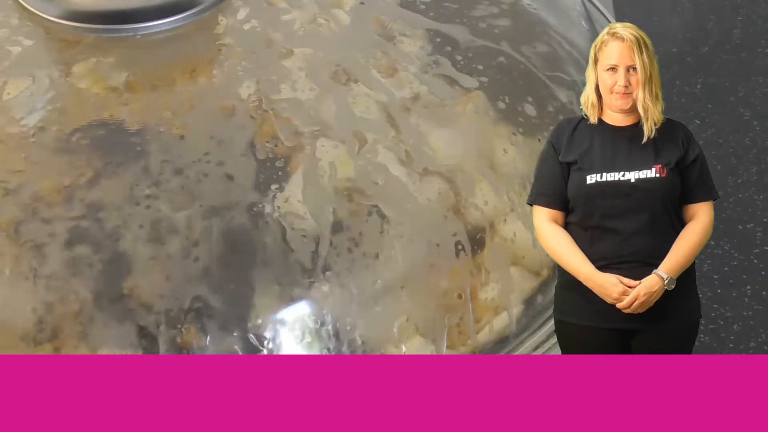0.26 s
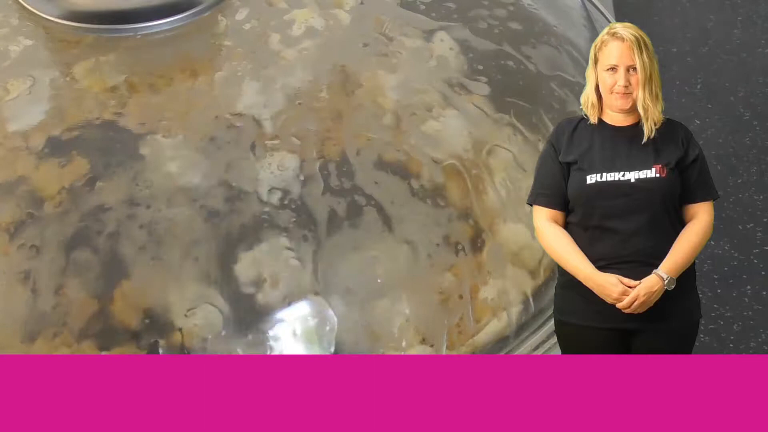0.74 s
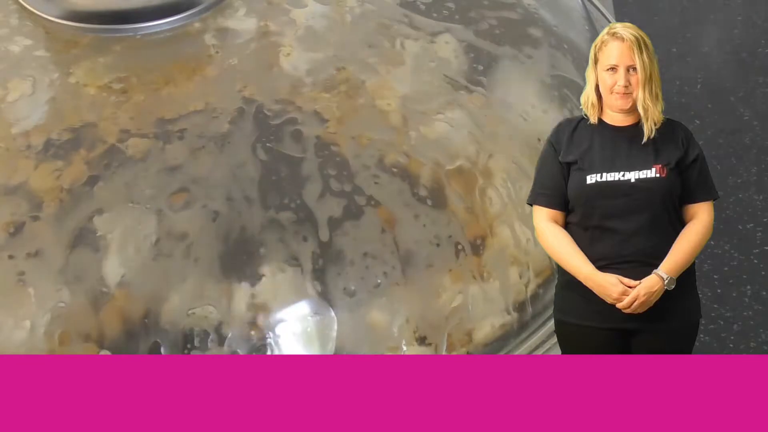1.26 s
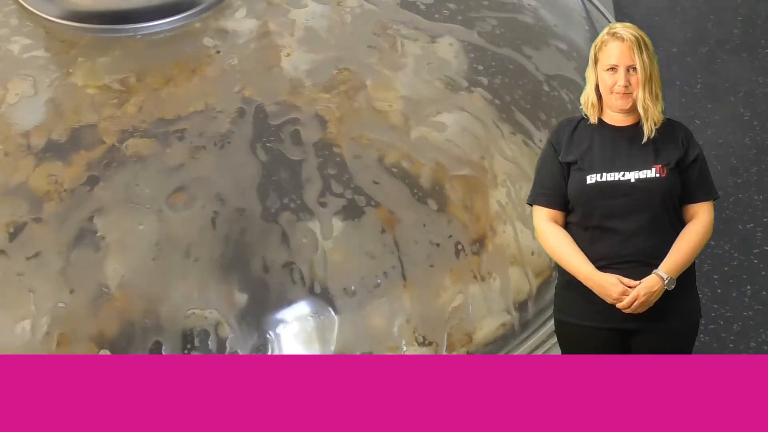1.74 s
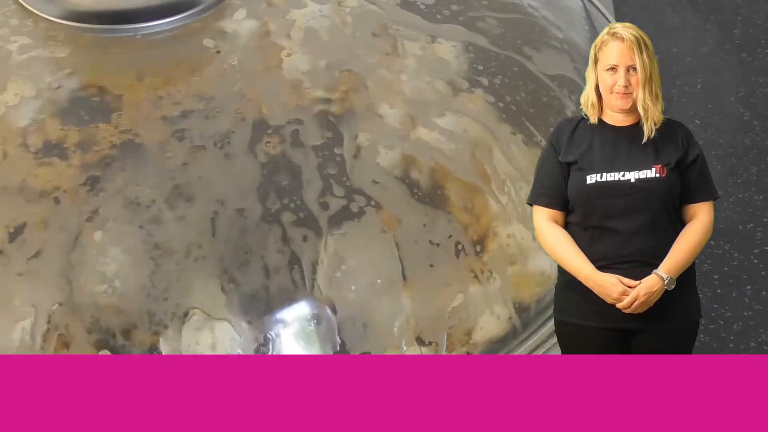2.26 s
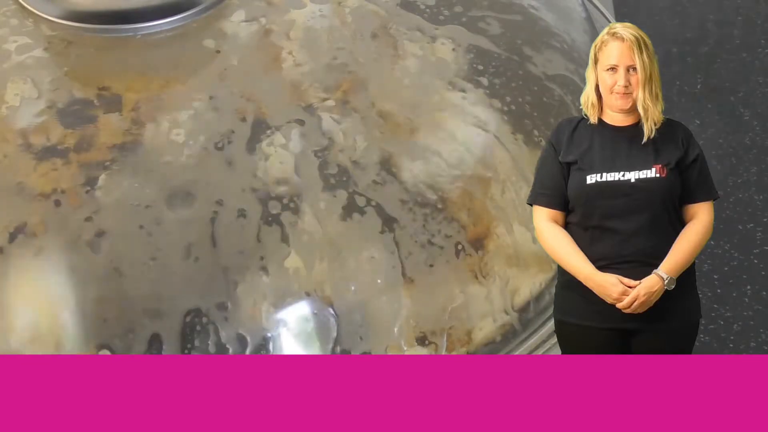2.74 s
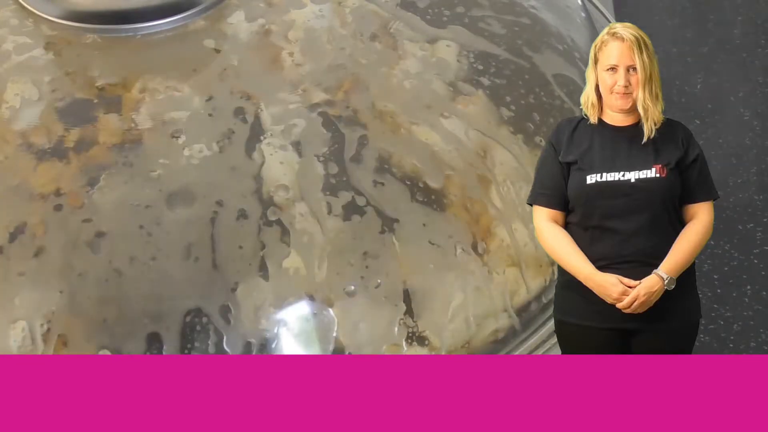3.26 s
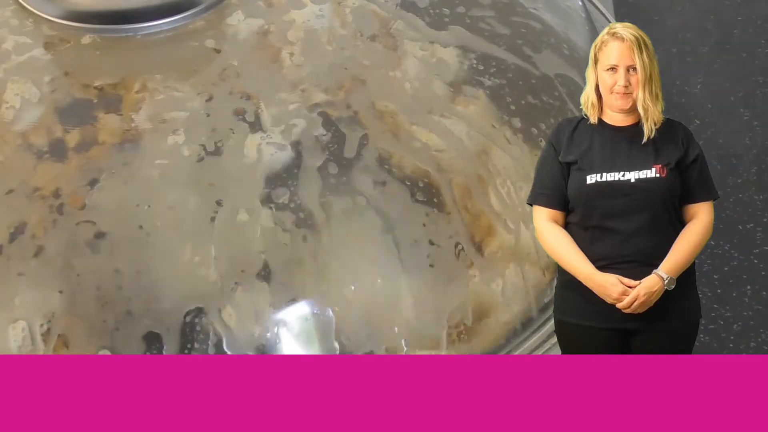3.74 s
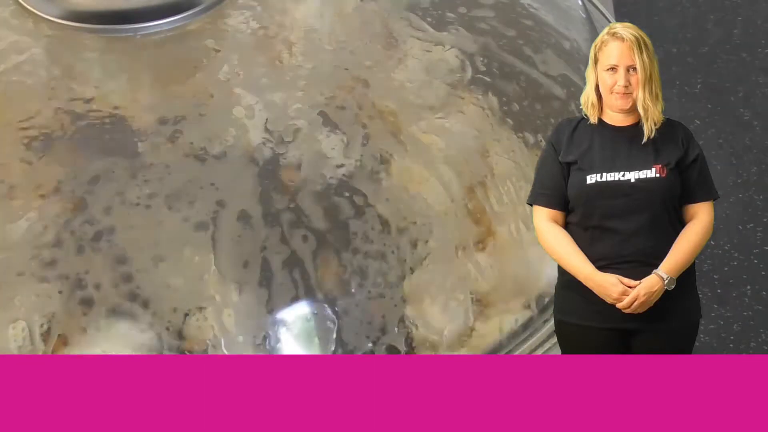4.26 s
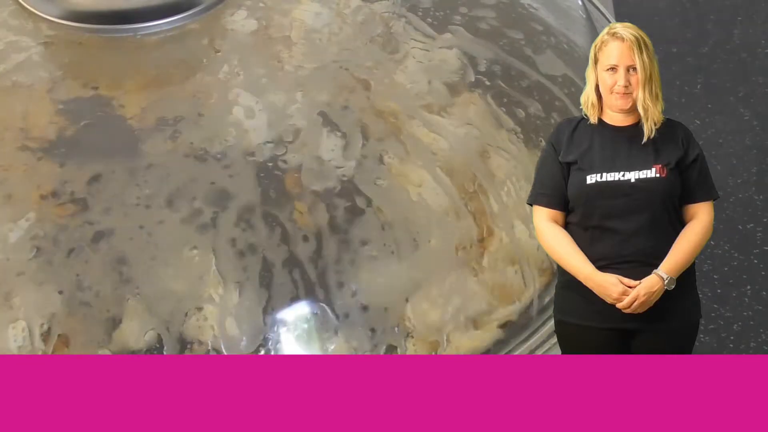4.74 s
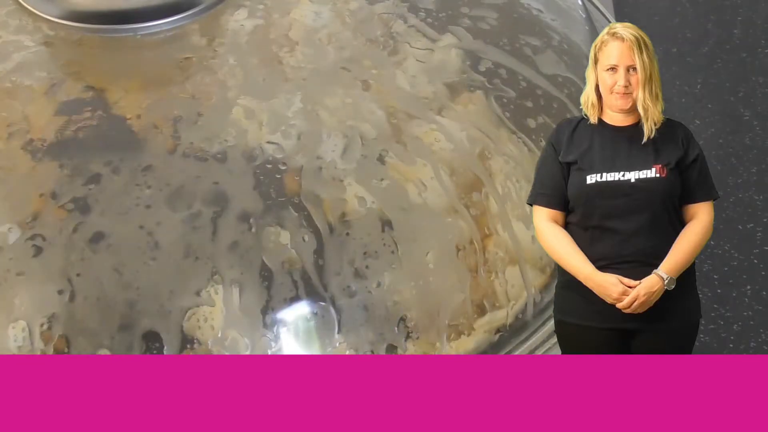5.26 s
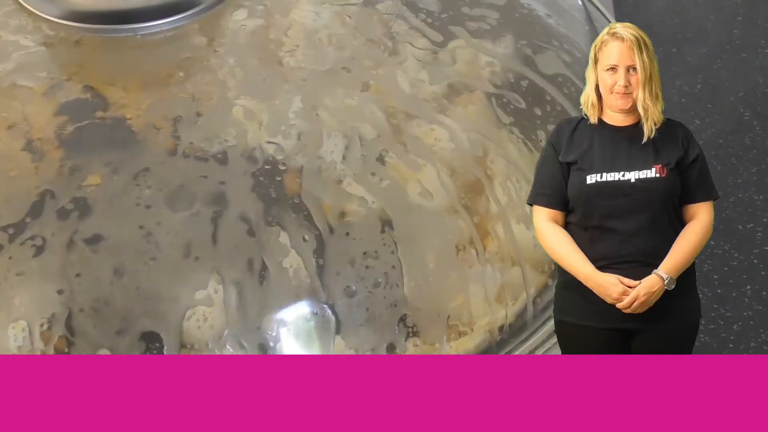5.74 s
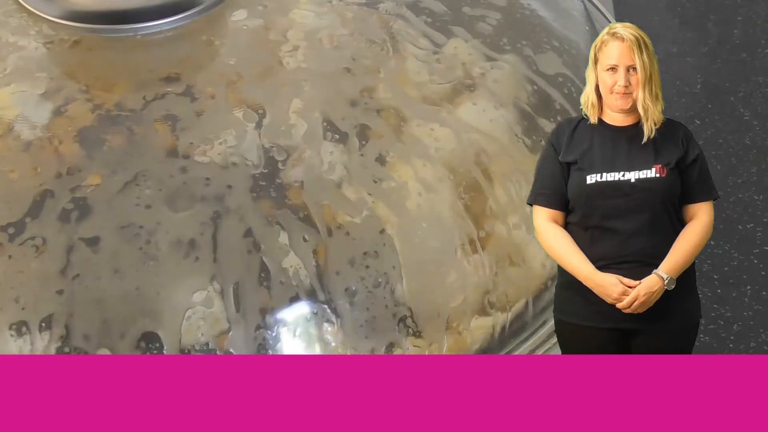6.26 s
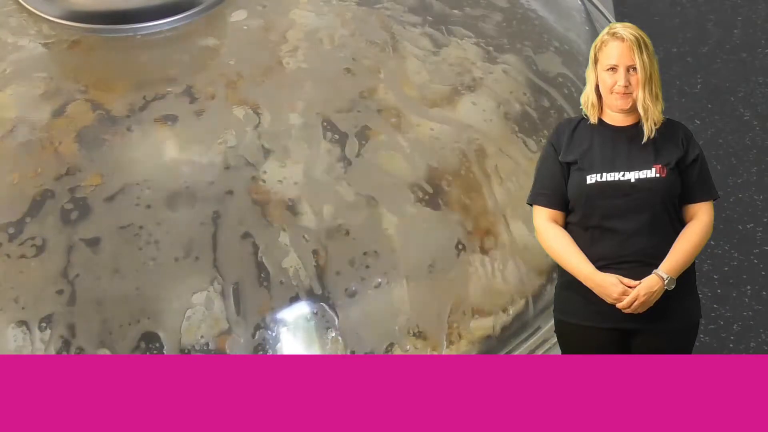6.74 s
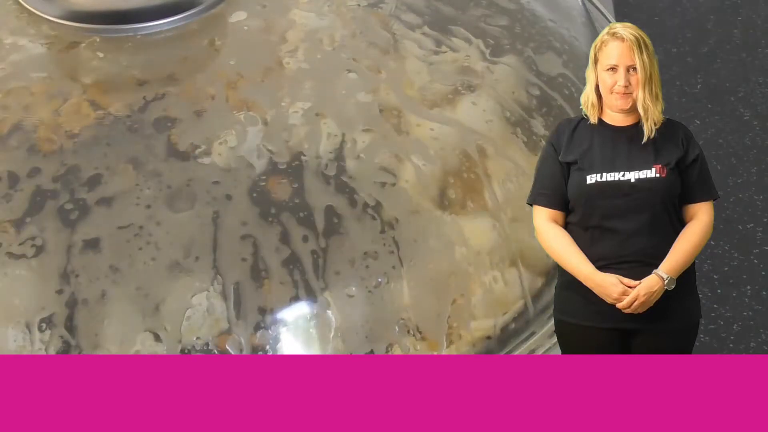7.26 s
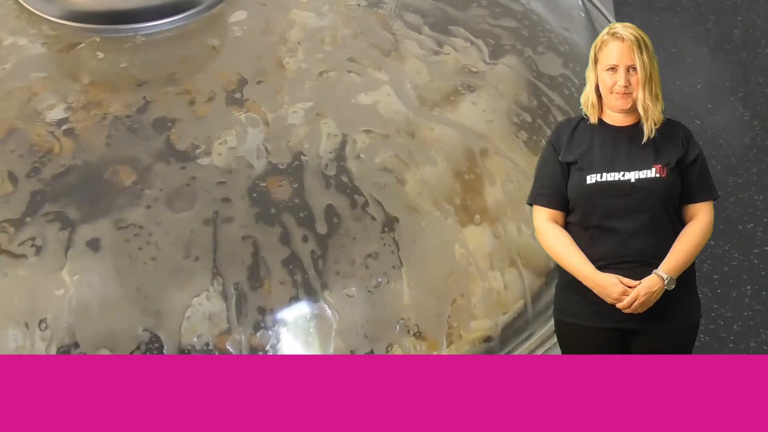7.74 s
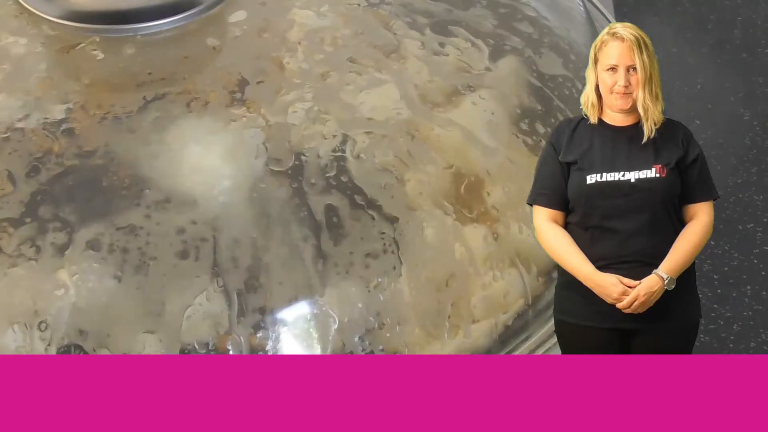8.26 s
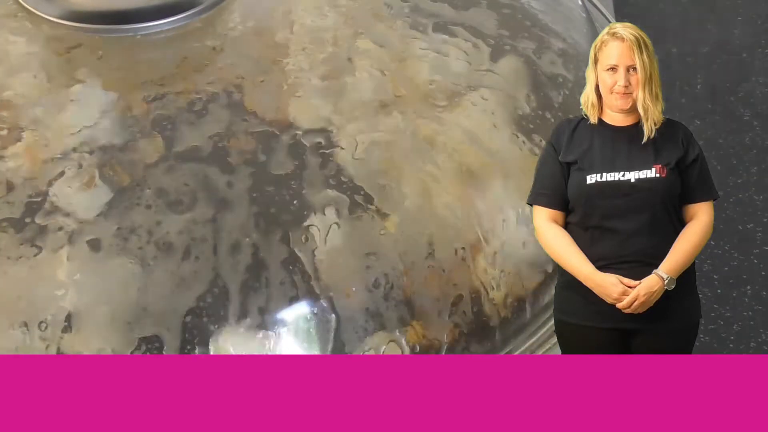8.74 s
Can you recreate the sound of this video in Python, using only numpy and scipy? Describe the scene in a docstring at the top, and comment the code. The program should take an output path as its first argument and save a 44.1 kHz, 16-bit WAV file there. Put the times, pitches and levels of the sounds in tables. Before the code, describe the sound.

Hot oil sizzles continuously in a lidded pan, its bubbling and bright fizz swelling and dropping in waves. Over it kernels burst at uneven intervals: crisp snaps, hollow lid knocks, soft low pan thuds and occasional dull steam puffs. Light pattering follows as neighbouring kernels land. Popping stays busy throughout, with brief gaps and clusters. The stereo microphone is very close, the loudest peaks slightly flattened, in a small room with little echo.

```python
"""In a small kitchen, popcorn pops in hot oil in a lidded pan, close to the microphone.
Moisture leaking from the kernels boils and fizzes in the oil: bursts of noise and small rings, swelling in waves.
Each pop cracks its hull (noise with a short ring), knocks the air under the lid and kicks the ringing pan.
Some let out a puff of steam, a pulse of pressure with a rush of noise; after each pop the neighbours
patter back down. Short reflections surround it all, and the loudest peaks are flattened."""
import sys
import numpy as np
from scipy import signal
from scipy.fft import rfft, irfft
from scipy.io import wavfile

SR = 44100
rng = np.random.default_rng(int(sys.argv[2]) if len(sys.argv) > 2 else 0)


def waveform_to_disk(signal):
    """Save audio, clipped to [-1, 1], as 16-bit WAV at the path in sys.argv[1]."""
    frames = np.transpose(np.atleast_2d(signal))
    scaled = np.clip(frames, -1, 1) * 32767
    samples = np.round(scaled).astype(np.int16)
    wavfile.write(sys.argv[1], SR, samples)


N = 396900  # length in samples: 9 seconds


def from_db(db):
    """Turns decibels into a gain."""
    return 10 ** (np.asarray(db) / 20)


def rms_one(x):
    """Scales a sound to an average strength (rms) of 1."""
    return x / np.sqrt(np.mean(x ** 2) + 1e-20)


def add(track, s, sound):
    """Mixes a short sound into a track at time s, in seconds."""
    i = max(round(s * SR), 0)
    track[..., i:i + sound.shape[-1]] += sound[..., :N - i]


def cut(x, hz, kind, order=2):
    """Low-pass or high-pass filter."""
    sections = signal.butter(order, hz, kind, fs=SR, output="sos")
    return signal.sosfilt(sections, x + 1e-18)


def drift(rate):
    """A random wander around 0 with spread about 1: straight lines between random points, rate per second."""
    return np.interp(np.arange(N) / SR * rate, np.arange(N), rng.standard_normal(N))


def colour(spectrum, resonances=(), size=4096):
    """Impulse response of a smooth spectrum with resonances on top, its energy as early as possible."""
    hz = np.maximum(np.arange(size // 2 + 1) * SR / size, 1)
    points = np.array(spectrum)
    gain = from_db(np.interp(np.log(hz), np.log(points[:, 0]), points[:, 1]))
    peaks = sum(from_db(db) ** 2 / (1 + (2 * (hz - f) / width) ** 2) for f, width, db in resonances)
    gain = gain * np.sqrt(1 + peaks)
    # folding the cepstrum forward gives the minimum-phase response
    cepstrum = irfft(np.log(gain))
    cepstrum[1:size // 2] *= 2
    cepstrum[size // 2 + 1:] = 0
    return irfft(np.exp(rfft(cepstrum)))


# How wide each pitch region spreads between the ears, before each sound's own width trim.
# Each row: frequency in Hz, level of the side signal against the middle in dB.
STEREO_WIDTH = [(100, 10), (500, -4), (800, -5), (1200, -9), (2700, -11.5), (4200, -99), (6400, -103),
                (8000, -16.5), (10000, -2.5), (15000, 0.5)]


def radiate(pair, spectrum, resonances=(), side_db=0):
    """Colours a middle and a side signal, keeps the power of noise, and makes left and right of them."""
    response = colour(spectrum, resonances)
    response = response / np.linalg.norm(response)
    mid, side = signal.fftconvolve(pair, [response], axes=1)[:, :N]
    side = from_db(side_db) * signal.fftconvolve(side, colour(STEREO_WIDTH))[:N]
    return np.array([mid + side, mid - side])


# The oil's own simmer beneath the leaks.
# Each row: time in seconds, level in dB.
SIMMER_LEVEL = [(0, -55.5), (1.6, -60.5), (2.8, -61.5), (4.7, -59.5), (5.7, -62.5), (7.0, -60),
                (8.04, -59.5), (8.09, -63), (8.22, -67.5), (8.4, -58.5), (9.0, -78.5)]
# Kernels leaking moisture into the oil, more and more until the leak ends.
# Each row: end in seconds, length in seconds, boiling at the end in dB, fizzing at the end in dB.
MOISTURE_LEAKS = [(0.362, .7, -51.5, -76), (0.84, 0.076, -51, -63), (0.926, 0.8, -56, -59),
                  (1.435, 0.61, -55, -53.5), (2.113, 0.42, -54.5, -53.5), (2.702, 0.57, -61, -58.5),
                  (3.787, 0.8, -55.5, -54.5), (4.404, 0.94, -58.5, -57.5), (4.603, 0.22, -59, -54.5),
                  (5.16, 0.4, -59, -55.5), (5.486, 0.14, -51, -56), (5.599, 0.39, -54, -51),
                  (5.83, 0.12, -62.5, -55), (6.246, 0.38, -61, -58.5), (6.614, 0.35, -58.5, -53),
                  (7.515, 0.33, -55, -54.5), (8.05, 0.59, -54, -51.5), (9.1, 0.58, -58, -51)]


def frying():
    """Gains of the boiling and the fizzing: a simmer plus leaks that swell and quickly die away."""
    simmer_fizz_db = 3.5  # the simmer's fizz against its boiling
    growth, release_s = 0.48, 0.023  # a leak grows as this power of its age; its dying time
    waver_db, waver_per_s = 0.17, 14
    t = np.arange(N) / SR
    simmer_db = np.interp(t, *np.transpose(SIMMER_LEVEL))
    power = from_db([simmer_db, simmer_db + simmer_fizz_db]) ** 2
    for end, length, boil_db, fizz_db in MOISTURE_LEAKS:
        swell = np.clip(1 + (t - end) / length, 0, 1) ** growth
        flow = swell * np.exp(-np.clip((t - end) / release_s, 0, 20))
        power += (from_db([[boil_db], [fizz_db]]) * flow) ** 2
    return np.sqrt(power) * from_db(waver_db * drift(waver_per_s))


def grains(per_s, spread_db, clump_db, clump_rate, smooth_db):
    """Tiny clicks come in clumps, a few large among many small, over a wash of steady noise."""
    born = rng.random(N) < per_s / SR
    sizes = from_db(spread_db * np.minimum(rng.exponential(1, N), 5))
    clicks = rms_one(born * sizes * rng.choice([-1, 1], (2, N)))
    wash = from_db(smooth_db) * rng.standard_normal((2, N))
    return rms_one((clicks + wash) * from_db(clump_db * drift(clump_rate)))


def spits(per_s, spread_db, burst_s):
    """Separate short bursts of noise at random times, each dying away, a few much louder than the rest."""
    born = rng.random(N) < per_s / SR
    sizes = born * from_db(spread_db * np.minimum(rng.exponential(1, N), 2.5))
    envelope = signal.lfilter([1], [1, -np.exp(-1 / (burst_s * SR))], sizes + 1e-18)
    return rms_one(envelope * rng.standard_normal((2, N)))


# Resonances of the air under the lid.
# Each row: frequency in Hz, width in Hz, strength over the direct sound in dB.
LID_AIR = [(1202, 95, 2), (1303.7, 45, 13), (2052, 71, 11.5), (2650, 140, 8), (3322, 36, 10.5),
           (4120, 61, 11), (4730, 22, 15.5), (5345, 24, 23)]


def bubbles(per_s, cycles, range_db, detune):
    """Bubbles burst and each pings one of three low resonances under the lid, most often the lowest of them."""
    lean_db = 4  # how strongly a bubble's place shifts it between the sides
    t, out = np.arange(SR // 15) / SR, np.zeros((2, N))
    draws = rng.random((1000, 6))
    times = np.cumsum(-np.log(1 - draws[:, 0])) / per_s
    for s, (_, size, pick, shift, length, place) in zip(times, draws):
        if s >= (N - 1) / SR:
            break
        resonance_hz = LID_AIR[1 + int(3 * pick ** 2)][0]
        hz = resonance_hz * (1 + detune * (2 * shift - 1))
        t60 = cycles / hz * (.5 + length)  # seconds to fade by 60 dB
        ring = from_db(-range_db * size - 60 * t / t60) * np.sin(2 * np.pi * hz * t)
        sides = from_db(np.array([[1], [-1]]) * lean_db * (2 * place - 1.5))
        add(out, s, ring * sides)
    return rms_one(out)


# Tone of the boil, also used for the knocks under the lid.
# Each row: frequency in Hz, relative level in dB per Hz.
BOIL_TONE = [(150, -20.5), (450, -2.5), (800, -0.5), (1100, 3.5), (1700, 1), (2400, -1.5), (4000, -1),
             (5500, -18.5), (8000, -14.5), (16000, -107)]


def boil(boiling):
    """Moisture simmers finely, sputters in small bursts and throws up separate bubbles."""
    simmer = from_db(-1) * grains(1200, spread_db=3.8, clump_db=1.8, clump_rate=60, smooth_db=-4)
    sputter = from_db(-2) * spits(per_s=60, spread_db=3.3, burst_s=.004)
    soft_sputter = cut(sputter, 1300, "low", order=1)
    blips = from_db(-7) * bubbles(per_s=45, cycles=70, range_db=10, detune=.025)
    return radiate(boiling * (simmer + soft_sputter), BOIL_TONE, LID_AIR) + boiling * blips


# Tone of the fizz.
# Each row: frequency in Hz, relative level in dB per Hz.
FIZZ_TONE = [(1000, -20), (4000, -5.5), (5500, -7.5), (6500, -2.5), (7300, 3.5), (8300, 2), (10000, -2.5),
             (12500, -11), (16000, -17.5)]


def fizz(fizzing):
    """Very many tiny bubbles burst in the oil and blur into a bright hiss."""
    fine = grains(3200, spread_db=3.6, clump_db=1.4, clump_rate=120, smooth_db=-3)
    return radiate(fizzing * fine, FIZZ_TONE, side_db=-1.5)


# Tone of a spitting droplet.
# Each row: frequency in Hz, relative level in dB per Hz.
SPIT_TONE = [(1500, -18), (5000, -10), (7500, 0), (11000, 0), (16000, -9)]


def droplet_ticks(fizzing):
    """Single droplets spit in the oil, each a very short, bright burst of noise."""
    droplets = from_db(-14) * spits(per_s=55, spread_db=3.5, burst_s=.0005)
    return radiate(fizzing * droplets, SPIT_TONE, side_db=2.0)


def soft_kick():
    """The force of one soft blow on the pan: a quick rise and a slightly slower fall."""
    kick_s = 0.00039
    t = np.arange(SR // 100) / SR
    return t * np.exp(-t / kick_s)


# Ringing tones of the pan and lid.
# Each row: frequency in Hz, relative level in dB, time to fade by 60 dB in seconds.
PAN_TONES = [(139, -21.5, .13), (166, -13.5, .12), (207, -10.5, .13), (240, -5.5, .1), (304, -8.5, .21),
             (330, 1.5, .042), (354, -4, .065), (381, -6, .065), (454, -15, .18)]


def pan_rings(force, vary_db):
    """A force makes every tone of the pan ring and fade; its drive may wander separately at each side."""
    out = 0
    for hz, db, t60 in PAN_TONES:
        r, w = from_db(-60 / (t60 * SR)), 2 * np.pi * hz / SR
        drive = force * from_db(db + vary_db * np.array([drift(13.0), drift(19)]))
        out = out + signal.lfilter([1, -r * np.cos(w)], [1, -2 * r * np.cos(w), r * r], drive + 1e-18)
    return out


# Bursting and landing kernels, all levels before the final mix.
# Each row: start in seconds, hull crack in dB, knock of the air under the lid in dB, thump of the pan in dB.
KERNEL_POPS = [(0.189, -50, -56.5, -45.5), (0.216, -49, -58, -63), (0.2533, -45, -49, -35.5),
               (0.3626, -50, -45, -39.5), (0.5412, -43.5, -47.5, -61), (.6793, -52, -67, -77),
               (0.7318, -52, -51, -75), (0.7726, -44, -42.5, -34), (0.795, -63, -56, -41.5),
               (0.9315, -44, -43.5, -55), (1.2308, -45, -49.5, -30.5), (1.365, -43, -49, -41.5),
               (1.461, -44, -52, -48), (1.7273, -53.5, -53, -70), (1.9576, -49.5, -53, -39),
               (2.044, -64, -51, -64), (2.06, -43.5, -47.5, -39.5), (2.1148, -45.5, -59, -61),
               (2.352, -45, -54, -39), (2.4382, -45.5, -56, -44.5), (2.6283, -48.5, -47.5, -45),
               (2.67, -48.5, -50.5, -47), (2.8983, -48, -46.5, -39), (3.002, -51.5, -54.5, -38.5),
               (3.1085, -66, -61, -40), (3.173, -62, -62, -55), (3.19, -55, -54, -39.5),
               (3.2, -55, -55, -55), (3.4206, -48.5, -49.5, -39), (3.5712, -48, -64, -54),
               (3.7666, -53, -48, -40.5), (3.7763, -47.5, -55, -58), (3.919, -54, -52, -47),
               (3.928, -54, -59, -52), (4.1341, -46, -51, -33.5), (4.139, -49, -53, -54),
               (4.2113, -49, -45.5, -32.5), (4.219, -50, -48, -67), (4.2362, -50, -56, -39),
               (4.3927, -51, -48, -89), (4.6337, -46.5, -47, -35.5), (4.9123, -45, -51, -38),
               (4.9895, -50, -56, -48), (5.063, -47.5, -50, -54), (5.07, -58, -56, -36.5),
               (5.381, -54, -50.5, -45), (5.4349, -52, -48, -47), (5.449, -54, -45.5, -40),
               (5.482, -58, -54, -41.5), (5.601, -47.5, -48, -57), (5.7585, -49, -50.5, -45.5),
               (5.849, -47.5, -57, -36.5), (5.952, -54, -50, -47), (6.015, -50.5, -44.5, -46.5),
               (6.069, -71, -53, -48), (6.0944, -60, -53, -64), (6.37, -62, -57, -49),
               (6.4486, -53, -54, -61), (6.576, -49, -45.5, -47), (6.632, -48, -46, -86),
               (6.7589, -48.5, -50.5, -50), (6.8579, -47, -58, -44.5), (6.974, -56, -54, -43.5),
               (7.08, -57, -72, -78), (7.1, -59, -72, -78), (7.139, -53, -63, -84),
               (7.1583, -55, -52.5, -85), (7.3023, -64, -55, -43.5), (7.377, -50.5, -71, -57),
               (7.457, -57, -50, -49), (7.5306, -43.5, -60, -39), (7.606, -58, -47, -45),
               (7.619, -52, -50, -49.5), (7.759, -50, -52, -48), (7.8347, -55, -67, -48),
               (7.914, -54, -65, -56), (8.026, -49.5, -46.5, -63), (8.0743, -42.5, -54, -65),
               (8.235, -45.5, -60, -76), (8.277, -51.5, -57, -48.5), (8.4094, -51, -77, -40),
               (8.6859, -52, -58, -36), (8.731, -47, -64, -36.5)]


def jostling():
    """Gain of the kernels' patter: every thump stirs it up, then it settles."""
    rest_db, stirred_db = -63.5, -59  # at rest; the part added by a typical thump, at its peak
    typical_thump_db, follows = -40.5, 0.35  # a typical thump; dB of patter per dB of thump
    throw_s, settle_s = 0.02, 0.11  # rise and dying time of the patter
    t, power = np.arange(SR) / SR, np.full(N, from_db(rest_db) ** 2)
    stir = (1 - np.exp(-t / throw_s)) * np.exp(-t / settle_s)
    stir = stir / stir.max()
    for s, crack_db, knock_db, thump_db in KERNEL_POPS:
        stir_db = stirred_db + follows * (thump_db - typical_thump_db)
        add(power, s, (from_db(stir_db) * stir) ** 2)
    return np.sqrt(power)


def patter():
    """Kernels thrown about by the pops land lightly and shake the pan with many small kicks."""
    apart = 0.23  # share of the side signal
    landings = grains(220, spread_db=1.5, clump_db=1.5, clump_rate=25, smooth_db=-7.5)
    mid, side = signal.fftconvolve(landings, [soft_kick()], axes=1)[:, :N]
    kicks = cut(np.array([mid + apart * side, mid - apart * side]), 175, "high", order=4)
    return jostling() * rms_one(pan_rings(kicks, vary_db=3.0))


# Clear pings of larger bubbles and of the air under the lid, before the slight lean to the left.
# Each row: start in seconds, frequency in Hz, peak in dB, time to fade by 60 dB in seconds.
CLEAR_PINGS = [(0.041, 2075, -42, 0.071), (0.256, 1260, -36, 0.053), (0.363, 1314, -39, 0.058),
               (0.745, 1307, -42, 0.095), (0.774, 1290, -35.5, 0.046), (0.834, 1810, -45, 0.099),
               (0.833, 2680, -40, 0.064), (1.150, 1310, -47, 0.084), (1.463, 1297, -40.5, 0.051),
               (1.746, 1308, -44.5, .071), (2.135, 2640, -50, 0.065), (3.959, 2655, -40.5, 0.084),
               (4.025, 1266, -41.5, 0.059), (4.212, 1317, -42, 0.081), (4.852, 1296, -44, .06),
               (5.063, 1315, -43, 0.07), (5.416, 1280, -43, .06), (5.435, 1310, -51, .06),
               (6.151, 2700, -49, 0.054), (6.158, 1280, -46, 0.036), (6.429, 1286, -45.5, 0.099),
               (7.008, 2660, -48, 0.074), (7.324, 1190, -42, 0.027), (7.399, 2060, -49, .04),
               (7.633, 1310, -42, 0.077), (7.716, 1294, -41, 0.073), (7.837, 1310, -46, 0.084),
               (7.916, 1280, -42, .05)]


def pings():
    """Larger bubbles and the knocked air under the lid ring: pure tones that fade quickly."""
    t, out = np.arange(SR // 10) / SR, np.zeros(N)
    for s, hz, db, t60 in CLEAR_PINGS:
        add(out, s, from_db(db - 60 * t / t60) * np.sin(2 * np.pi * hz * t))
    return out


def bursts(levels_db, tear_s, tail_db, tail_s, echo_db, echo_s):
    """Each pop is a very short burst of noise with a tail and an echo; levels are as rms over 10 ms."""
    t, out = np.arange(SR // 10) / SR, np.zeros((2, N))
    for row, db in zip(KERNEL_POPS, levels_db):
        tear = tear_s * from_db(2.5 * rng.standard_normal())  # no two pops are equally quick
        echo = from_db(echo_db) * np.exp(-np.abs(t - echo_s) / tear)
        shape = np.exp(-(t / tear) ** 2) + from_db(tail_db) * np.exp(-t / tail_s) + echo
        burst = shape * rng.standard_normal((2, len(t)))
        # the burst spans 100 ms, so its energy is moved to a 10 ms reference
        add(out, row[0], from_db(db) * rms_one(burst) / np.sqrt(10))
    return out


def hull_rings(cracks, low_hz, high_hz, width_hz, ring_db):
    """Every hull is a different size and adds a brief ring of its own pitch to its crack."""
    out = cracks.copy()
    for row in KERNEL_POPS:
        hz = rng.uniform(low_hz, high_hz)
        i = round(row[0] * SR) - 10  # begin just before the crack
        b, a = signal.iirpeak(hz, hz / width_hz, fs=SR)
        add(out, i / SR, from_db(ring_db) * signal.lfilter(b, a, cracks[:, i:i + SR // 200]))
    return out


# Tone of a cracking hull.
# Each row: frequency in Hz, relative level in dB per Hz.
CRACK_TONE = [(1000, -6.5), (4000, -42), (5500, -2.5), (6500, 4.5), (7400, 11), (8500, 5), (10000, 1),
              (12500, -7), (16000, -12.5)]


def hull_cracks(fizzing):
    """Hulls tear with a bright crack and a ring; small bits of hull snap at random times too."""
    levels_db = np.transpose(KERNEL_POPS)[1]
    snaps = from_db(-68) * rms_one(fizzing) * spits(per_s=5, spread_db=2.5, burst_s=0.0018)
    tears = bursts(levels_db, tear_s=0.00063, tail_db=-4.5, tail_s=0.012, echo_db=-13.5, echo_s=0.0081)
    cracks = radiate(snaps + tears, CRACK_TONE, side_db=-2.0)
    return hull_rings(cracks, low_hz=7600, high_hz=14500, width_hz=2600, ring_db=6.0)


def lid_knocks():
    """Each burst strikes the air under the lid, which rings at its resonances."""
    levels_db = np.transpose(KERNEL_POPS)[2]
    blows = bursts(levels_db, tear_s=0.002, tail_db=-7.5, tail_s=0.008, echo_db=-11, echo_s=0.009)
    return radiate(blows, BOIL_TONE, LID_AIR, side_db=-1.0)


def thumps(level_db):
    """Each kernel kicks the pan softly, then again more weakly a few milliseconds later, as a rebound."""
    rebound_s, rebound_db = .0062, -4.5  # typical wait for the second kick; its level against the first
    force, kick = np.zeros(N), soft_kick()
    for s, crack_db, knock_db, thump_db in KERNEL_POPS:
        push = from_db(thump_db + level_db) * kick / kick.sum()
        add(force, s, push)
        add(force, s + rebound_s * rng.uniform(.95, 1.05), from_db(rebound_db) * push)
    return pan_rings(force, vary_db=0.0)


def place_pan(body, lag_s, pan_db):
    """Sets the pan to the right: the right side is a moment later but louder."""
    late = np.interp(np.arange(N) - lag_s * SR, np.arange(N), body[1])
    return np.array([body[0] * from_db(-pan_db), late * from_db(pan_db)])


# Pressure pulses of escaping steam, before a shared level trim and a random shift of the low edge.
# Each row: start in seconds, pulse peak in dB, low edge in Hz, high edge in Hz, left minus right in dB.
STEAM_PUFFS = [(0.5427, -32.5, 240, 1150, -6), (0.9336, -26.5, 100, 1260, -5), (1.233, -28, 16, 620, 2),
               (1.4609, -36, 18, 417, -6), (2.6290, -29.5, 10, 540, 1), (2.9006, -30, 11, 477, 1),
               (3.7673, -21.5, 270, 1150, 0), (4.3944, -26.5, 960, 1040, -2), (4.9125, -37, 45, 610, -3),
               (5.602, -38, 10, 350, 21), (6.0165, -39, 420, 1310, 0), (6.6331, -35, 16, 367, -5),
               (8.0745, -36, 14, 550, -1), (8.2354, -39.5, 74, 1230, -3)]


def puffs(level_db, rush_db, rush_s, rush_hz):
    """Steam leaves in one pulse of pressure with a turbulent rush, followed by a slower suction."""
    t, out = np.arange(SR // 10) / SR, np.zeros((2, N))
    for s, db, low_hz, high_hz, pan_db in STEAM_PUFFS:
        push = cut(signal.unit_impulse(len(t)), high_hz, "low")
        # each side gets its own low edge
        pulse = np.array([cut(push, low_hz * from_db(rng.normal(0, 2.9)), "high", order=1)
                          for side in range(2)])
        noise = cut(cut(rng.standard_normal(len(t)), rush_hz, "low"), 620, "high")
        rush = rms_one(noise) * np.exp(-t / rush_s)
        # the faster the pulse, the more turbulence comes with it
        sound = pulse / pulse.max() + from_db(rush_db) * high_hz / rush_hz * rush
        sides_db = np.array([[pan_db], [-pan_db]]) / 2
        add(out, s, from_db(db + level_db + sides_db) * sound)
    return out


def kitchen(x, wet_db, wall_hz, delay_s):
    """The small room adds a short tail of blurred reflections, different at each side."""
    t60 = 0.1  # seconds for the tail to fade by 60 dB
    t = np.arange(SR // 2) / SR
    noise = cut(rng.standard_normal((2, len(t))), wall_hz, "low", order=1)
    tail = noise * from_db(-60 * t / t60) * (t > delay_s)
    tail *= from_db(wet_db) * np.sqrt(wall_hz / SR) / np.linalg.norm(tail, axis=1, keepdims=True)
    return x + signal.fftconvolve(x, tail, axes=1)[:, :N]


def scene():
    """Pops over the boiling and fizzing, all in the kitchen."""
    boiling, fizzing = frying()
    oil = fizz(fizzing) + droplet_ticks(fizzing)
    # what sounds under the lid leans slightly to the left
    under_lid = (boil(boiling) + pings() + lid_knocks()) * from_db([[1.2], [-1.2]])
    pan = place_pan(patter() + thumps(level_db=-3.5), lag_s=0.00032, pan_db=3.0)
    cracks = hull_cracks(fizzing)
    steam = puffs(level_db=3.5, rush_db=1.5, rush_s=0.00099, rush_hz=2780)
    return kitchen(oil + under_lid + pan + cracks + steam, wet_db=-22.5, wall_hz=3160, delay_s=0.0055)


def record(dry):
    """Peaks are flattened at a low ceiling and everything above 16 kHz is cut."""
    ceiling = .055
    held = dry / (1 + (dry / ceiling) ** 6) ** (1 / 6)
    return signal.sosfilt(signal.ellip(10, .1, 70, 16000, fs=SR, output="sos"), held)


dry = scene()
out = record(dry)
waveform_to_disk(out)
```